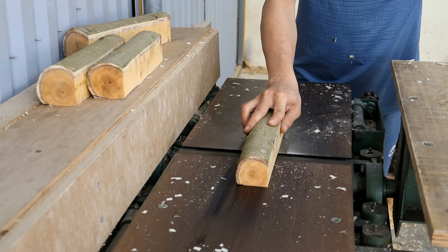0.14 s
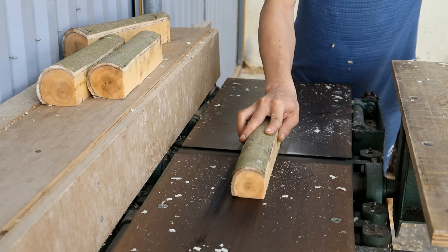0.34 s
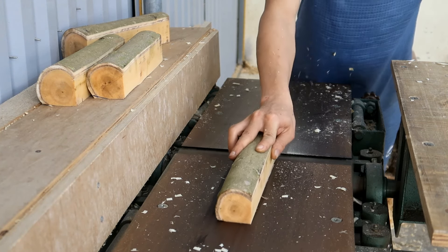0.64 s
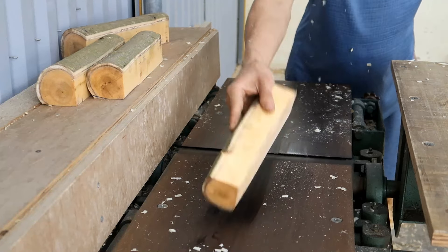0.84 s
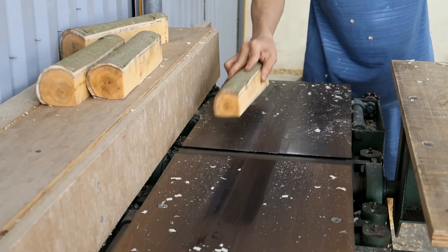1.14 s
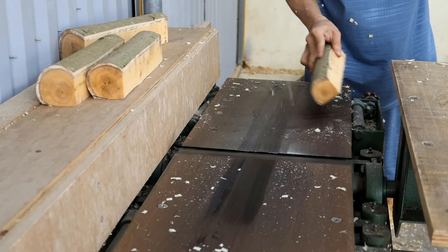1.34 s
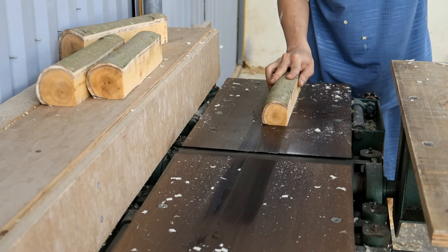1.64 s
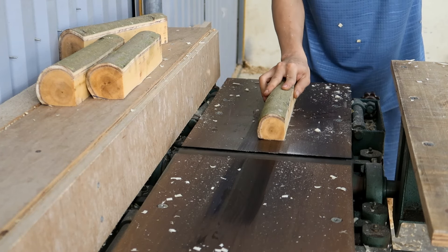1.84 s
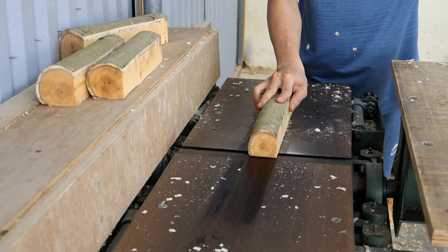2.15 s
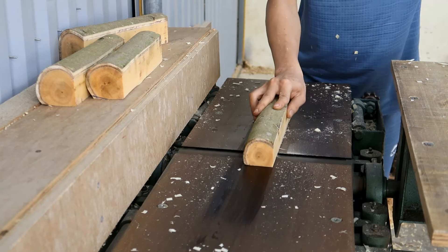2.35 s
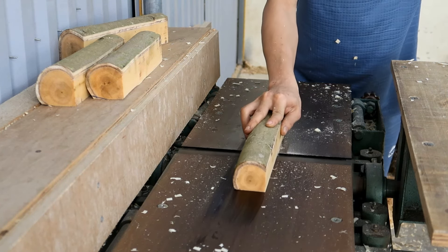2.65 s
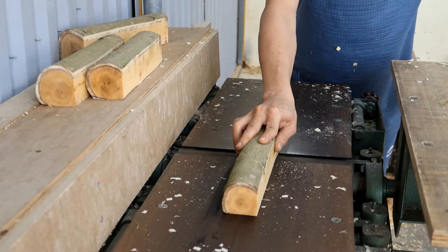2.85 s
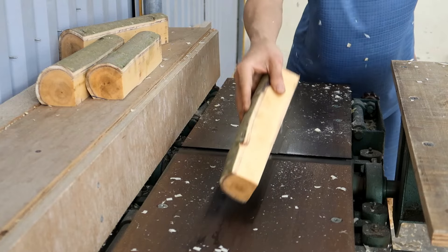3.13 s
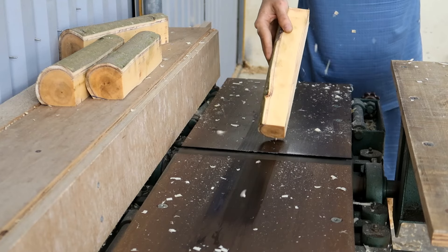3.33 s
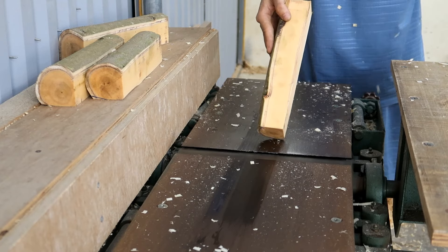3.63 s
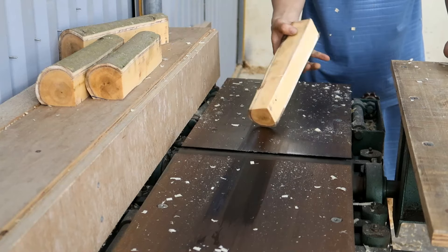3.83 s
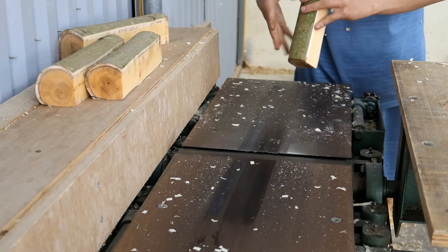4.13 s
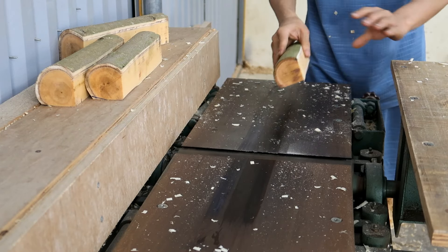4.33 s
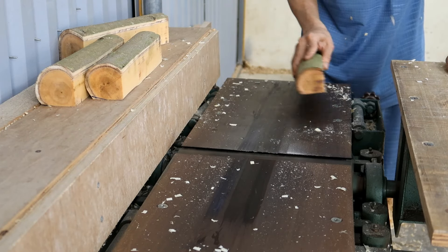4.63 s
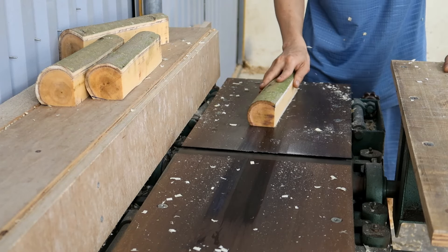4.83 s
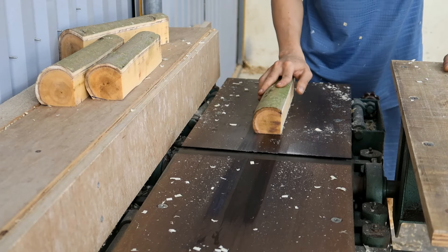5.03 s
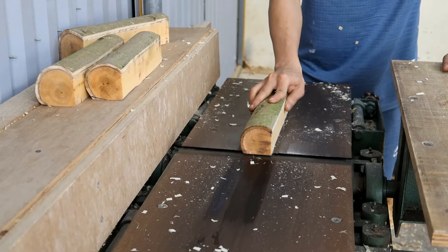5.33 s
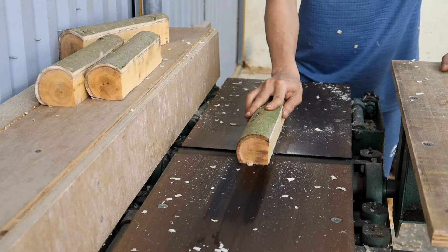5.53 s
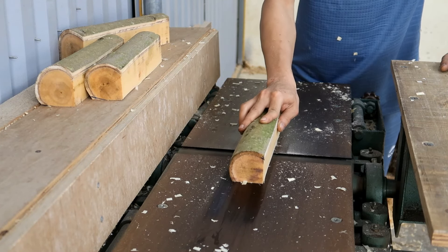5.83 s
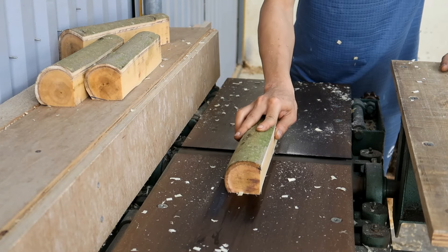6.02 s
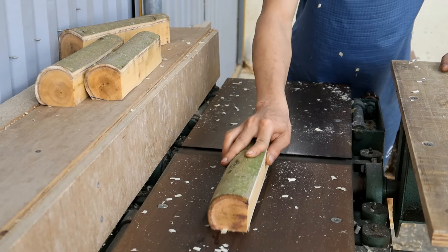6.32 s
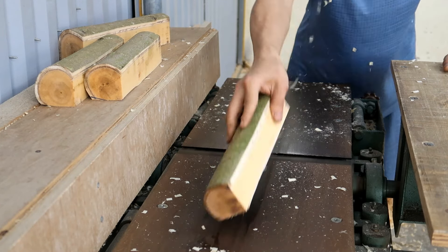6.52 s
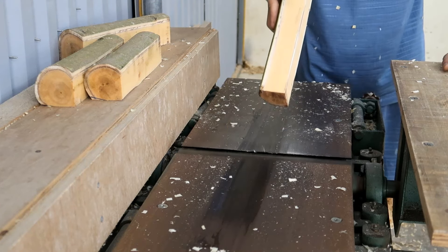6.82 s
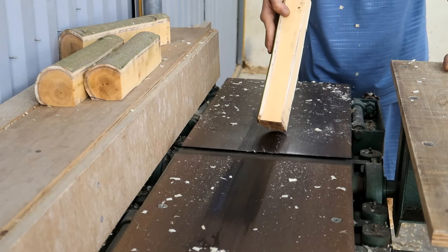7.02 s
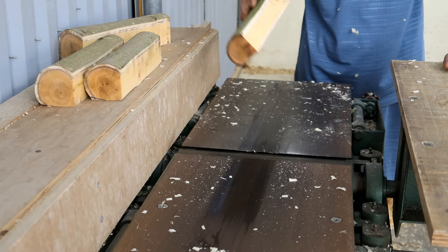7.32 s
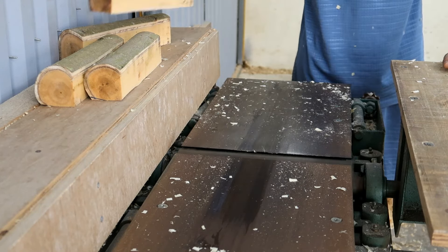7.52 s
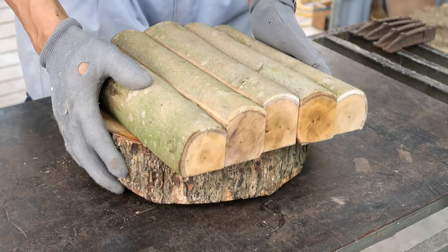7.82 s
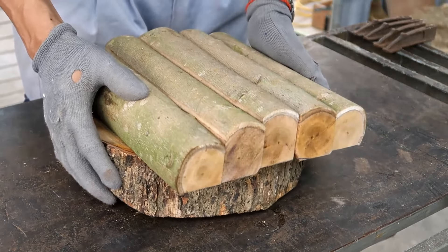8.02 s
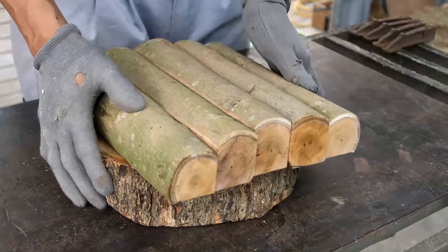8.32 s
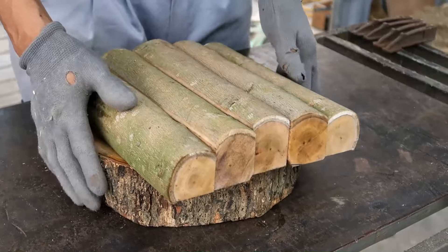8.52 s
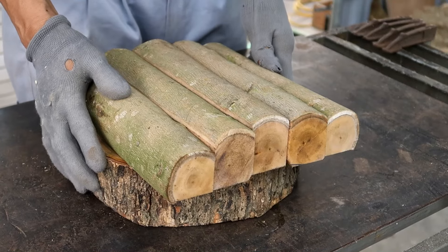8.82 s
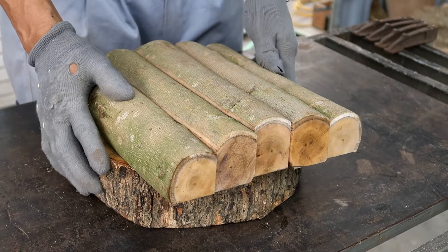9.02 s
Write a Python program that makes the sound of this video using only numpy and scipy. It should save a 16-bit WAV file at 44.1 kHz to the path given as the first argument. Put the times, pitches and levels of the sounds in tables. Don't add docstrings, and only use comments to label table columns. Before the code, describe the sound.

Close, compressed, unsteady stereo pickup of a running woodworking machine: low drone, rumble and breathy whistle throughout. Three hurried cuts bring gritty spray and hollow wooden chatter, the first rough from the start, the others building toward their ends. Dull taps and one loud bright clack fall between them. An abrupt change leaves near-silent shop air, soft shifting and glove scrapes, then a slab lands heavily on a steel bench, loose pieces clattering briefly, with a small room echo.

```python
import sys
import numpy as np
from scipy import signal
from scipy.fft import rfft, irfft, next_fast_len
from scipy.io import wavfile
from scipy.ndimage import map_coordinates

SR = 44100
rng = np.random.default_rng(int(sys.argv[2]) if len(sys.argv) > 2 else 0)


def materialize(psi):
    bounded = np.clip(np.atleast_2d(psi).T, -1, 1)
    quanta = np.round(bounded * 32767).astype(np.int16)
    wavfile.write(sys.argv[1], SR, quanta)


def natural_amplitude(level_db):
    exponent = np.asarray(level_db, float) / 20
    return 10 ** exponent


N = 403956
T = np.arange(N) / SR
EDIT_S = 7.607


def unit(x):
    return x / np.sqrt(np.mean(x ** 2) + 1e-20)


def along(points, hz):
    f, v = np.transpose(points)
    return np.interp(np.log(hz + 1), np.log(f + 1), v)


def curves(rows, outside=None):
    s, *cols = np.transpose(rows)
    return [np.interp(T, s, c, outside, outside) for c in cols]


def wobble(rate):
    knots = rng.standard_normal((2, int(N * rate / SR) + 4))
    return np.array([map_coordinates(k, [T * rate]) for k in knots])


def filtered(x, response):
    m = next_fast_len(N + SR // 2)
    return irfft(rfft(x, m) * response(np.fft.rfftfreq(m, 1 / SR)), m)[..., :N]


def resonances(modes):
    def response(f):
        return sum((-1) ** k * natural_amplitude(db) * 1j * f * w / (c * c - f * f + 1j * f * w)
                   for k, (c, w, db) in enumerate(modes))
    return response


def coloured(points):
    return lambda f: natural_amplitude(along(points, f))


def noise(alike):
    a, b = rng.standard_normal((2, N))
    u = np.arccos(np.clip(alike, 0, 1)) / 2
    return np.array([np.cos(u) * a + np.sin(u) * b, np.cos(u) * a - np.sin(u) * b])


def ring(modes, scatter_db, attack):
    t = np.arange(SR) / SR
    tones = sum(natural_amplitude(db + scatter_db * rng.normal() - 60 * t / t60) * np.sin(2 * np.pi * hz * t)
                for hz, db, t60 in modes)
    return tones * (1 - np.exp(-t / attack))


def swell_and_fade(seconds, rise_s):
    t = np.arange(int(SR * seconds)) / SR
    return t, t / rise_s * np.exp(1 - t / rise_s)


def bumps(rows):
    return sum(db * np.exp(-((T - s) / length) ** 2) for s, db, length in rows)


def add(track, sound, s):
    part = track[round(s * SR):][:len(sound)]
    part += sound[:len(part)]


def short_rings(rows, rise_s, level_db):
    out = np.zeros((2, N))
    t, shape = swell_and_fade(.05, rise_s)
    for (s, db, hz), (start, lag) in zip(rows, rng.random((len(rows), 2))):
        for side in range(2):
            late_s = side * (lag - .5) * .1 / 1000
            tone = np.sin(2 * np.pi * (start + hz * (t - late_s)))
            add(out[side], natural_amplitude(db + level_db) * shape * tone, s)
    return out


# time in seconds, slip in ms.
SPLICES = [(0.06, -1.4), (0.24, 3.5), (0.33, -2.7), (0.42, -1.2), (0.51, 4.3), (0.56, -1.7), (0.64, -3.9),
           (0.71, -3.4), (0.78, 2.5), (0.85, 1.3), (0.94, 2.3), (1.07, -2.3), (1.12, -1.3), (1.225, -2.1),
           (1.49, -1.3), (1.69, 1.5), (1.76, -0.3), (1.81, 1.3), (1.99, 1.0), (2.05, -1.0), (2.3, -2.3),
           (2.47, 5.3), (2.57, 0.9), (2.63, 4.4), (2.71, -1.5), (2.97, 1.9), (3.04, 1.8), (3.12, -4.0),
           (3.17, -0.1), (3.24, -1.5), (3.39, 2.1), (3.49, -2.6), (3.68, 5.4), (3.74, -1.7), (3.87, -1.2),
           (3.94, 1.2), (4.07, 0.9), (4.37, -2.8), (4.46, -2.0), (4.61, -1.5), (4.82, -3.1), (4.87, -7.5),
           (4.92, 2.6), (5.07, -2.2), (5.23, 1.3), (5.49, -2.2), (5.54, 5.7), (5.66, -5.3), (5.77, 3.6),
           (5.9, -2.0), (6.19, -3.3), (6.25, -3.5), (6.48, 2.9), (6.58, -4.5), (6.68, 0.1), (6.73, -3.3),
           (6.91, 2.2), (7.17, -2.1), (7.4, 1.0), (7.5, 2.2)]


def clocks():
    splice_s, lead_ms = .025, .7
    slips = sum(ms * (1 + np.tanh((T - s) / splice_s)) / 2 for s, ms in SPLICES)
    lead = (lead_ms + slips) / 2000
    return T + 0.004766 * wobble(1.5)[0] + 0.00078 * wobble(12)[0] + np.array([lead, -lead])


# time of the deepest point in seconds, depth in dB, fall in seconds.
DUCKS = [(.5, 1.1, 0.57), (6.05, 1.2, 0.36), (.69, 3.5, .05), (.74, 7.5, 0.03), (1.555, 4.1, 0.011),
         (2.26, 2.6, 0.067), (2.94, 3.6, 0.044), (3.01, 9.4, 0.027), (4.82, 15.1, 0.013), (6.33, 3, 0.067),
         (6.39, 5.2, 0.04)]


def gain_db():
    open_db, recover_s, recover_shape, cut_sag_db = -15.5, 0.39, 1.55, 2
    ducks = []
    for s, db, fall in DUCKS:
        climb = (np.abs(T - s) / recover_s) ** recover_shape
        ducks.append(-db * np.exp(-np.where(T < s, ((s - T) / fall) ** 2, climb)))
    sag = 0
    for rows in CUTS:
        start, end = rows[0][0], rows[-1][0]
        sag = sag + np.interp(T, [start, end, end + recover_s], [0, -cut_sag_db, 0])
    return open_db + sag + np.min(ducks, axis=0)


# multiple of the rotor turn, dB under the main tone at four turns, wander in radians.
HUM = [(1, -24.5, 1.4), (6, -23.5, 1.6), (8, -20.5, 0.64), (12, -21.5, 1.5)]
# time in seconds, channel, depth in dB.
DIPS = [(0.017, 0, 5), (0.021, 1, 5), (0.174, 1, 10), (0.57, 1, 12), (0.662, 1, 4), (0.667, 0, 6),
        (0.716, 1, 6), (0.721, 0, 8), (0.76, 1, 11), (0.765, 0, 12), (1.544, 0, 14), (1.545, 1, 13),
        (2.282, 1, 5), (2.569, 0, 10), (2.973, 0, 6), (2.993, 1, 13), (3.318, 0, 5), (4.569, 0, 14),
        (4.57, 1, 6), (4.814, 0, 16), (4.837, 1, 8), (4.858, 0, 8), (5.568, 0, 5), (5.568, 1, 5),
        (5.77, 1, 5), (5.771, 0, 10), (5.949, 0, 4), (6.065, 0, 9), (6.199, 1, 13), (6.403, 0, 8),
        (6.403, 1, 9), (6.57, 1, 10), (7.57, 0, 10)]
# frequency in Hz, level in dB per Hz.
AIR = [(20, -8.5), (50, 4), (80, -6.5), (115, 4), (160, 4.5), (210, 4.5), (330, 0), (520, -4), (700, -10.5),
       (1100, -19.5), (1900, -41), (3000, -17.5), (4000, -25.5), (7000, -31), (11000, -41), (14000, -63)]
# frequency in Hz, width in Hz, level in dB.
CAVITY = [(808, 125, -4), (1450, 173, -1.5), (2270, 213, 2.5), (2625, 205, -1)]


def motor(clock):
    rotor_hz, dip_s, dip_grows = 40.2, 0.0055, 6.3
    turn = 2 * np.pi * rotor_hz * clock
    main = 4 * turn + .4 * wobble(18)[0] + .2 * wobble(30)
    tone = np.sin(main) + 0.12 * np.cos(2 * main)
    orders = sum(natural_amplitude(db + 2.7 * wobble(28)) * np.sin(k * turn + wander * wobble(14)) for k, db, wander in HUM)
    dip_db = np.array([bumps([(s, db, dip_s) for s, channel, db in DIPS if channel == side])
                       for side in range(2)])
    hum = np.sqrt(2) * (natural_amplitude(0.25 * wobble(24) - dip_grows * dip_db) * tone + orders)

    throb = 1 - 0.085 * np.sin(main) + 0.073 * np.cos(2 * turn)
    air = unit(filtered(noise(0.044) * throb * natural_amplitude(1.66 * wobble(25)), coloured(AIR)))

    puffing = np.exp(0.13 * np.cos(2 * turn + 0.78 * wobble(9)))
    draught = noise(0.1) * throb * puffing * natural_amplitude(1.98 * wobble(20))
    whistle = sum((-1) ** k * natural_amplitude(3.17 * wobble(9)) * filtered(draught, resonances([mode]))
                  for k, mode in enumerate(CAVITY))
    whistle = unit(filtered(whistle, lambda f: 1 / (1 + (f / 2900) ** 8)))
    return natural_amplitude(gain_db()) * (hum + natural_amplitude(-6.5) * air + natural_amplitude(-9) * whistle)


def kicks(rows):
    rise_s, level_db = 0.004026, -4.5
    out, swell = np.zeros((2, N)), np.zeros(N)
    t, shape = swell_and_fade(.05, rise_s)
    for s, db, hz, delay_ms in rows:
        start = 2 * np.pi * rng.random()
        add(swell, natural_amplitude(db) * shape, s - rise_s)
        for side, lag in enumerate([0, delay_ms / 1000]):
            tone = np.sin(2 * np.pi * hz * (t - lag) + start)
            add(out[side], natural_amplitude(db + level_db) * shape * tone, s - rise_s)
    return out, swell


# time in seconds, bite in dB, chatter of the branch in dB.
CUTS = [
    [(0.0, -37.5, -34), (.17, -33.5, -27.5), (.47, -34.5, -27), (.51, -36, -25), (.58, -31, -29.5),
     (.615, -34, -23.5), (.67, -34, -23.5), (.69, -30.5, -23), (.77, -36, -24)],
    [(2.16, -26.5, -32), (2.2, -34.5, -29), (2.37, -35, -38), (2.55, -29, -34.5), (2.68, -27.5, -32),
     (2.86, -28, -32), (2.9, -25.5, -22.5), (3.03, -36.5, -20)],
    [(5.44, -34, -46), (5.48, -34, -35), (5.69, -31.5, -32.5), (5.76, -33, -43), (5.81, -34, -36),
     (6.0, -32, -32.5), (6.08, -33.5, -26), (6.37, -29, -23.5), (6.415, -35, -23.5)],
]
# time in seconds, peak in dB, pitch in Hz, right delay in ms.
KICKS_LOW = [(0.119, -18, 860, 0.47), (0.177, -14, 880, -0.22), (0.262, -13, 890, -0.27),
             (0.291, -13, 870, 0.5), (0.302, -30, 880, 0.52), (0.42, -9, 880, -0.3), (0.458, -9, 880, 0.31),
             (0.469, -12, 880, 0.27), (0.485, -14, 870, 0.14), (0.505, -17, 853, 0.05),
             (0.579, -12, 870, -0.52), (0.608, -17, 880, -0.44), (0.618, -11, 840, 0.1),
             (0.647, -9, 850, -0.19), (0.665, -8.5, 874, -0.068), (0.704, -22, 860, -0.28),
             (0.713, -12, 880, 0.46), (0.721, -14, 920, 0.56), (0.735, -15, 890, -0.46),
             (0.743, -10, 870, 0.54), (0.762, -13, 880, -0.38), (2.892, -21, 870, -0.64),
             (2.9, -15, 880, -0.24), (2.921, -12, 845, -0.33), (2.939, -11.5, 880, -0.01),
             (2.959, -15, 850, 0.19), (2.989, -11, 880, -0.13), (3.002, -14, 870, 0.49),
             (3.012, -10.5, 880, -0.26), (6.13, -16, 850, -0.36), (6.147, -20, 920, -0.34),
             (6.175, -18, 880, 0.13), (6.197, -16, 890, 0.27), (6.212, -23, 890, 0.45),
             (6.275, -21, 830, 0.18), (6.316, -22, 865, 0.16), (6.333, -27, 870, 0.11),
             (6.341, -15, 844, 0.068), (6.359, -9, 860, -0.56), (6.384, -7, 890, 0.23),
             (6.403, -17, 915, -0.39)]
# time in seconds, peak in dB, pitch in Hz, right delay in ms.
KICKS_HIGH = [(0.144, -17, 1350, -0.0078), (0.23, -18, 1305, 0.061), (0.268, -26, 1400, -0.28),
              (0.334, -15, 1300, -0.13), (0.398, -15, 1400, -0.038), (0.7295, -22, 1420, -0.03),
              (0.7357, -24, 1300, -0.045), (0.749, -14, 1480, -0.03), (0.76, -15, 1450, -0.13),
              (0.77, -13, 1490, 0.2), (2.352, -13, 1320, 0.21), (2.37, -22, 1400, 0.14),
              (2.407, -18, 1450, -0.059), (2.699, -13, 1350, 0.28), (2.709, -18, 1340, 0.44),
              (2.738, -16, 1350, -0.23), (2.785, -21.5, 1400, -0.12), (2.794, -14, 1360, -0.46),
              (2.966, -14, 1450, -0.11), (2.98, -17, 1770, 0.0), (2.999, -15, 1550, -0.06),
              (3.015, -14, 1400, -0.055), (3.023, -20, 1700, 0.18), (5.948, -23, 1474, -0.03),
              (6.031, -17, 1440, -0.19), (6.059, -20, 1430, 0.02), (6.07, -15.5, 1530, -0.058),
              (6.089, -27, 1430, -0.11), (6.098, -18, 1390, -0.17), (6.145, -20, 1360, -0.28),
              (6.391, -27, 1460, -0.16), (6.402, -22, 1520, -0.063), (6.413, -16.5, 1335, 0.011)]
# frequency in Hz, level in dB per Hz.
SPRAY = [(1710, -3), (2900, -0.5), (3310, -15), (3670, -1.5), (5810, -7.5), (6930, -7), (9750, -10),
         (12100, -20.5), (13900, -58)]
# frequency in Hz, width in Hz, level in dB.
HOOD = [(3540, 250, -4), (4520, 400, 4), (5500, 310, 7.5), (5900, 170, 6.5), (7800, 390, -10)]
# frequency in Hz, width in Hz, level in dB.
BRANCH_LOW = [(890, 163, -6), (560, 480, -16)]
# frequency in Hz, width in Hz, level in dB.
BRANCH_HIGH = [(1312, 160, 2), (1600, 230, -3), (2270, 310, -1.5), (3045, 7.2, -1.5)]


def knives(clock):
    shaft_hz, branch_hz, kick_spray = 53.64, 876, 0.56
    entry_s, exit_s, ring_out_s = 0.033, 0.03, 0.12
    turn = 2 * np.pi * shaft_hz * (clock + 0.0011 * wobble(20))
    pulse = 0.14 * np.cos(2 * turn) + 0.061 * np.cos(turn) + 0.23 * np.cos(4 * turn)
    bite = np.exp(pulse + 0.066 * wobble(60))
    thud, thud_swell = kicks(KICKS_LOW)
    clack, clack_swell = kicks(KICKS_HIGH)

    flurry = natural_amplitude(1.5 * wobble(9)[0] + 1.34 * wobble(30) + 1.6 * wobble(300))
    chips = noise(0.024) * (1 + kick_spray * (thud_swell + clack_swell)) * bite * flurry
    spray = unit(filtered(chips, coloured([(900, -34), (1800, -6)] + list(SPRAY))))
    hood = sum(natural_amplitude(3.5 * wobble(8)) * filtered(chips, resonances([mode])) for mode in HOOD)
    spray += natural_amplitude(-6.5) * unit(hood)

    drift = np.cumsum(18 * wobble(40), 1) / SR
    sung = np.sin(2 * np.pi * (branch_hz * clock + drift)) * bite * natural_amplitude(1.7 * wobble(35)[0])
    low = unit(unit(sung) + 1.12 * unit(filtered(noise(0.15) * bite, resonances(BRANCH_LOW))))
    jolt = np.exp(.12 * (np.cos(2 * turn) + wobble(70)[0]))
    low = unit(low * jolt)
    high = unit(filtered(noise(0.21) * bite * jolt * natural_amplitude(0.61 * wobble(45)[0]), resonances(BRANCH_HIGH)))
    squeal_modes = [(1090, 300, 0), (1480, 540, 8.5), (2060, 440, 1.5), (4550, 150, -4)]
    squeal = unit(filtered(chips * jolt, resonances(squeal_modes)))

    upper_floor_db, upper_share, tail_kick_db, tail_kick_s = -32, 0.34, -22.5, 0.084
    out = thud + clack
    for rows in CUTS:
        start, end = rows[0][0], rows[-1][0]
        bite_db, chatter_db = curves(rows)
        moments = [start - 2 * entry_s, start - entry_s, start, end, end + exit_s, end + exit_s + ring_out_s]
        contact_db = np.interp(T, moments, [-90, -30, 0, -1.0, -4.5, -38], -120, -120)
        upper_db = upper_floor_db + upper_share * (chatter_db - upper_floor_db) + 3.4 * wobble(14)[0]
        leaving = np.clip(1 + (T - end) / tail_kick_s, 0, 1) ** .5
        branch = natural_amplitude(chatter_db + 1.8 - 5.4 * leaving) * low + natural_amplitude(upper_db + 4.0) * high
        branch = branch + natural_amplitude(tail_kick_db) * leaving * squeal
        ring_out = natural_amplitude(np.minimum(contact_db, 0) * 2.8 * (T > end))
        out = out + natural_amplitude(contact_db) * (natural_amplitude(bite_db + 0.4) * unit(spray) + ring_out * branch)
    return out


# time in seconds, peak in dB, pitch in Hz.
PUFFS = [(0.0267, -16, 2620), (0.2319, -14, 2320), (0.3775, -26, 2370), (0.5926, -18, 2170),
         (0.7753, -18, 2450), (1.4027, -17, 2240), (1.488, -17, 2240), (1.9081, -17, 2290),
         (1.9555, -16.5, 2490), (2.1854, -28, 2350), (2.5037, -16, 2300), (2.5287, -17, 2350),
         (2.572, -13, 2650), (2.8499, -23, 2210), (2.9332, -21, 2150), (3.5389, -17, 2340),
         (3.6197, -13.5, 2290), (3.6451, -17, 2300), (3.785, -13.5, 2300), (3.8726, -18, 2200),
         (4.4593, -19, 2440), (4.5002, -17, 2240), (4.57, -20, 2390), (4.619, -23, 2480),
         (4.6463, -19, 2390), (4.75, -25, 2380), (4.808, -18, 2120), (4.9856, -26.5, 2160),
         (5.5687, -18, 2350), (5.6072, -27, 2140), (5.6987, -13, 2440), (5.9648, -20, 2150),
         (6.0104, -26, 2400), (6.1908, -18, 2340), (6.2911, -17, 2400), (6.3115, -15, 2350),
         (6.3774, -21, 2180), (6.5755, -19, 2330), (6.6792, -21, 2170), (6.7356, -23, 2330),
         (6.8219, -19, 2320), (7.3826, -18, 2300), (7.4794, -19, 2300), (7.5662, -17, 2380),
         (7.5884, -19, 2500)]


def puffs():
    return short_rings(PUFFS, .0035, -6)


# time in
# seconds, peak in dB, pitch in Hz.
PINGS = [(.687, -27, 4450), (.7283, -20, 4530), (.7283, -10, 1440), (.7343, -11, 1300), (.7345, -17, 2850),
         (.7345, -27, 6200), (.7343, -22, 4450), (.748, -27, 4550), (.7572, -22, 4530), (.769, -27, 4500),
         (2.9404, -25, 5000), (2.9683, -28, 4710), (2.9877, -23, 4430), (2.9877, -27, 5200),
         (3.0252, -23, 4460), (3.0252, -27, 5050), (6.2868, -29, 4500), (6.3058, -34, 4550),
         (6.3277, -31, 4620), (6.34, -29, 4560), (6.3522, -29, 4520), (6.362, -29, 4540),
         (6.3951, -26, 4540)]


def pings():
    return short_rings(PINGS, .001, -1)


# time in seconds, peak in dB, brightness in dB, right delay in ms, right dB.
TAPS = [
    (1.271, -14, -14, 2.65, 4),
    (1.535, -13, -9, 3.3, 7.5),
    (4.537, -15, -10, 3, 5),
    (4.8041, -0.5, -1, 1.975, -1.5),
    (4.838, -23, -6, 1, 4),
]
# frequency in Hz, width in Hz, level in dB.
TAP_MODES = [(460, 250, -2), (880, 200, -0.5), (1300, 300, 1.5), (1590, 50, 8), (2000, 920, -1.5),
             (2890, 410, -6.5), (3540, 1400, -26), (4600, 2900, -25), (7460, 2500, -45)]
# time in seconds, pitch in Hz, level in dB, fade of 60 dB in seconds.
TAP_NOTES = [
    (1.272, 872, -17, .09),
    (1.273, 560, -18, .09),
    (1.538, 415, -15, 0.068),
    (1.536, 1470, -14, 0.045),
    (1.536, 1230, -18, .04),
    (4.808, 1550, -17, 0.07),
    (4.807, 1200, -16, .04),
    (4.807, 770, -14.5, 0.046),
]


def taps():
    out, t = np.zeros((2, N)), np.arange(SR // 4) / SR
    hz = np.fft.rfftfreq(len(t), 1 / SR)
    for s, db, bright_db, delay_ms, right_db in TAPS:
        tilt = natural_amplitude(bright_db * np.log2(hz / 800 + 0.37))
        wood = resonances(TAP_MODES)(hz) * tilt / (1 + 1j * hz / 9500) ** 4
        dull_s = -bright_db / 4000
        for side, (lag, side_db) in enumerate([(0, 0), (delay_ms / 1000, right_db)]):
            burst = np.exp(-((t - .004 - dull_s) / (.0028 + dull_s)) ** 2)
            blow = burst + natural_amplitude(-9 - 60 * t / .24)
            clack = irfft(rfft(blow * rng.standard_normal(len(t))) * wood)
            add(out[side], natural_amplitude(db + side_db) * clack / np.abs(clack).max(), s + lag)
    for s, *mode in TAP_NOTES:
        for track in out:
            add(track, ring([mode], 0, 0.0018), s)
    return out


# frequency in Hz, level in dB per Hz.
QUIET = [(12, -36), (20, -10), (49, -13), (70, -7), (132, -11.5), (806, -19.5), (1830, -26), (3840, -30.5),
         (7200, -39), (10300, -44), (13900, -53)]
# frequency in Hz, likeness from -1 to 1.
QUIET_ALIKE = [(60, 0.99), (130, 1), (280, 0.73), (610, 0.92), (1320, 0.68), (2860, 0.52), (6200, -0.41),
               (13400, -0.37)]
# time in seconds, dB over the air, length in seconds.
SHIFTS = [
    (7.666, -0.5, 0.028),
    (7.81, 2.5, 0.063),
    (8.06, 3, 0.052),
    (8.2, 0.5, 0.036),
    (8.876, 2, 0.069),
]
# time in seconds, dB over the air, length in seconds.
BRUSH = [
    (7.92, 3.5, .04),
    (8.24, 7, .006),
    (8.307, 5.5, .03),
    (8.816, 1.5, 0.027),
    (8.95, 4.5, 0.038),
]


def still_air():
    low_start_db, high_start_db, settle_depth_db, settle_s = -44, -61.5, -5.5, 0.27
    settle_db = settle_depth_db * np.clip((T - BLOWS[1][0]) / settle_s, 0, 1)
    low_db = low_start_db + 0.49 * settle_db + bumps(SHIFTS)
    high_db = high_start_db + settle_db + bumps(BRUSH)

    def mid_and_side(f):
        u = np.arccos(np.clip(along(QUIET_ALIKE, f), 0, 1)) / 2
        return natural_amplitude(along(QUIET, f)) * np.array([np.cos(u), np.sin(u)])

    mid, side = filtered(rng.standard_normal((2, N)), mid_and_side)
    air = np.array([mid + side, mid - side])
    low = filtered(air, lambda f: 1 / (1 + (f / 2200) ** 4))
    return natural_amplitude(low_db + 0.4 * wobble(1.66)[0]) * unit(low) + natural_amplitude(high_db + 8.0) * unit(air - low)


# frequency in Hz, fade of 60 dB in seconds.
SHOP = [(150, 0.86), (1000, 0.45), (1700, 0.67), (3000, 0.36), (9000, 0.58)]


def shop(x):
    hz, t, z = signal.stft(noise(0.98)[:, :SR], SR, nperseg=256)
    fade = natural_amplitude(-60 * t / along(SHOP, hz)[:, None])
    tail = signal.istft(z * fade, SR, nperseg=256)[1]
    return signal.fftconvolve(x[None], tail / np.linalg.norm(tail[0]), axes=1)[:, :N]


# time in seconds, level in dB, rattle of loose pieces in dB.
BLOWS = [
    (8.235, -50, 5),
    (8.318, -1.5, -16.5),
    (8.328, -6, -6),
    (8.338, -7.5, -4),
    (8.353, -10.5, 1.5),
    (8.367, -15.5, -3),
    (8.381, -14.5, 1),
    (8.405, -22.5, 5),
    (8.42, -22.5, 4),
]
# frequency in Hz, level in dB, fade of 60 dB in seconds.
SLAB = [(105, -12.5, 0.28), (162.5, -2.5, 0.34), (216.3, -5, 0.17), (371, -7.5, 0.24), (450, -9.5, 0.2),
        (560.7, -22, 0.2), (622, -1, 0.11), (764, -6.5, 0.19), (1090, -11.5, 0.16), (1236, -11, .1),
        (1408, -15, 0.19)]
# frequency in Hz, width in Hz, level in dB.
CLATTER = [(189, 130, -1.5), (614, 470, -1), (1060, 450, -2.5), (1400, 260, -8.5), (1820, 700, -13.5),
           (2400, 700, -10), (3000, 750, -10), (4140, 1300, -18), (6250, 4600, -25.5)]
# frequency in Hz, level in dB, fade of 60 dB in seconds.
BENCH = [(36, -28, .1), (102, -35, 4), (183, -41, 2), (339, -44, 4.5), (544, -51, 1.7), (673, -49, 1.2),
         (1600, -41, .5)]


def slab():
    body, rattle, bench = np.zeros((3, N))
    t = np.arange(SR) / SR
    for s, db, rattle_db in BLOWS:
        add(body, natural_amplitude(db - 7.0) * ring(SLAB, 1.8, 0.00056), s)
        add(rattle, natural_amplitude(db + rattle_db + 14.0 - 60 * t / 0.13) * rng.standard_normal(SR), s)
    add(bench, natural_amplitude(2.0) * ring(BENCH, 0, .003), BLOWS[1][0])

    def softened(f):
        treble = 1 / (1 + 1j * f / 11000) ** 6 / (1 + (f / 9200) ** 24)
        return treble * f ** 4 / (f ** 4 + 70 ** 4)

    knock = filtered(body + filtered(rattle, resonances(CLATTER)), softened)
    return knock + bench + natural_amplitude(-5) * shop(knock)


def scene():
    clock = clocks()
    first = np.clip((EDIT_S - T) / 0.0059, 0, 1)
    jointer = motor(clock) + knives(clock) + puffs() + pings() + taps()
    return first * jointer + (1 - first) * (still_air() + slab())


def starved(x):
    always_kept_hz, bar_db, scatter_db = 8300, -15, 3
    hz, _, z = signal.stft(x, SR, nperseg=2048)
    power = np.mean(np.abs(z) ** 2, axis=0)
    bands = np.repeat(power[:-1].reshape(64, 16, -1).mean(axis=1), 16, axis=0)
    whim_db = np.repeat(scatter_db * rng.standard_normal((64, power.shape[1])), 16, axis=0)
    midrange = power[(hz > 3000) & (hz < 8000)].mean(axis=0)
    bar = midrange * natural_amplitude(2 * (bar_db + whim_db))
    kept = np.pad((bands > bar) | (hz[:-1, None] < always_kept_hz), ((0, 1), (0, 0)))
    return signal.istft(z * kept, SR, nperseg=2048)[1][:, :N]


def band_limit(x):
    return signal.sosfilt(signal.butter(12, 14040, fs=SR, output="sos"), x)


def record(dry):
    top_hz = 13000
    heard = filtered(np.clip(dry, -1, 1), lambda f: 1 / (1 + (f / top_hz) ** 60))
    finished = starved(heard)
    return band_limit(finished)


dry = scene()
out = record(dry)
materialize(out)
```